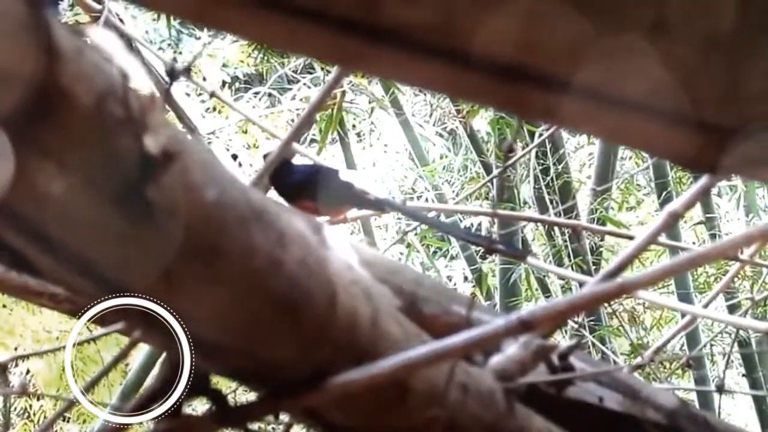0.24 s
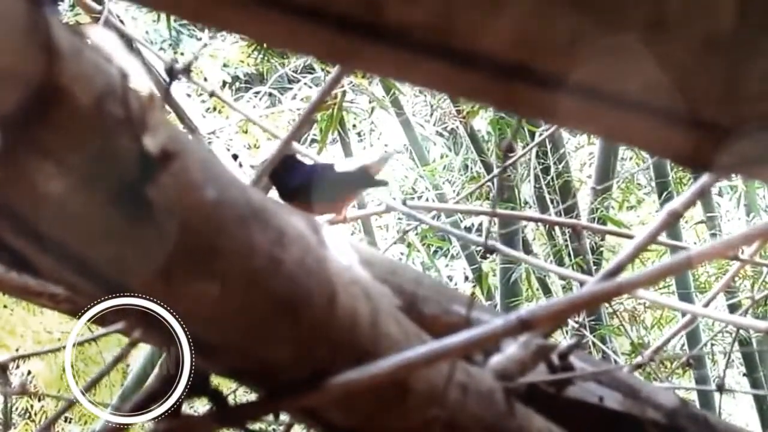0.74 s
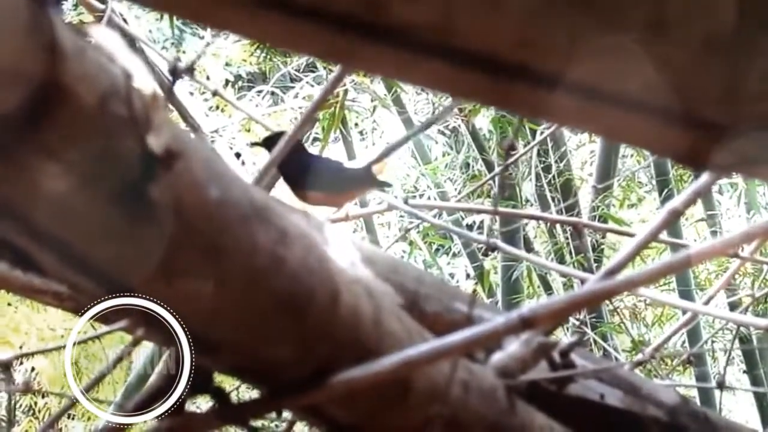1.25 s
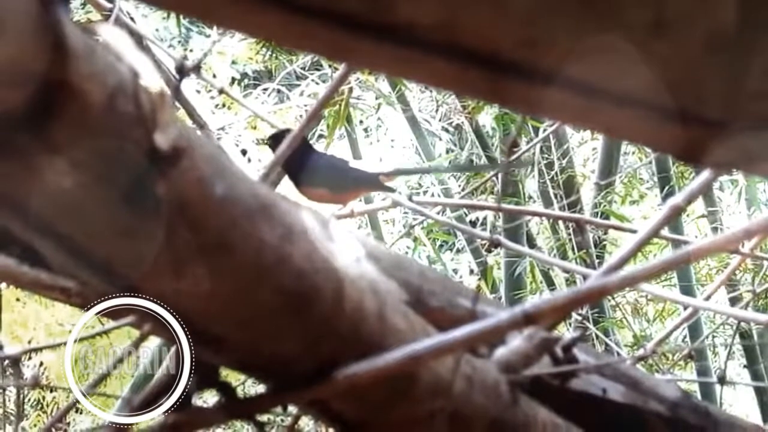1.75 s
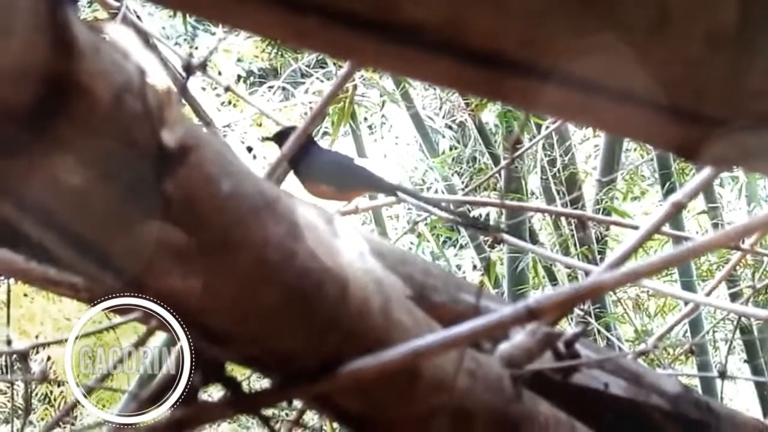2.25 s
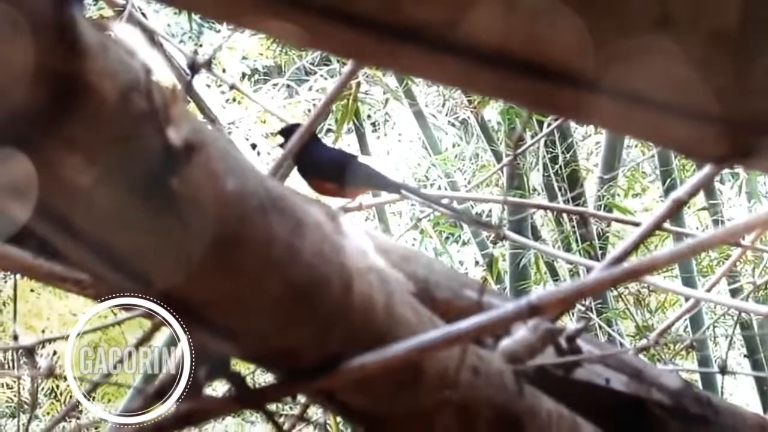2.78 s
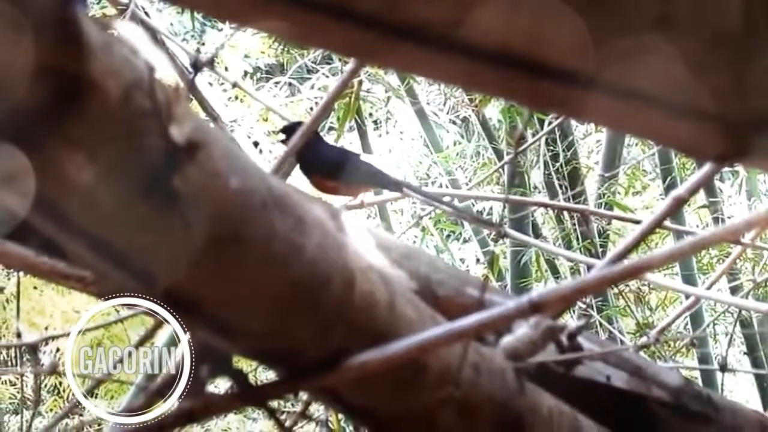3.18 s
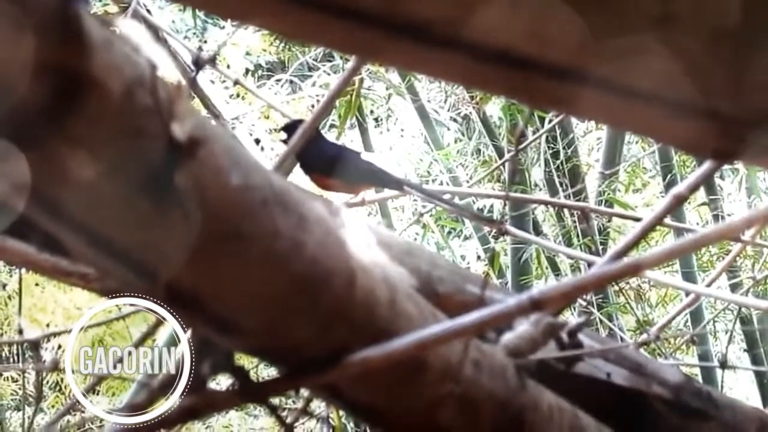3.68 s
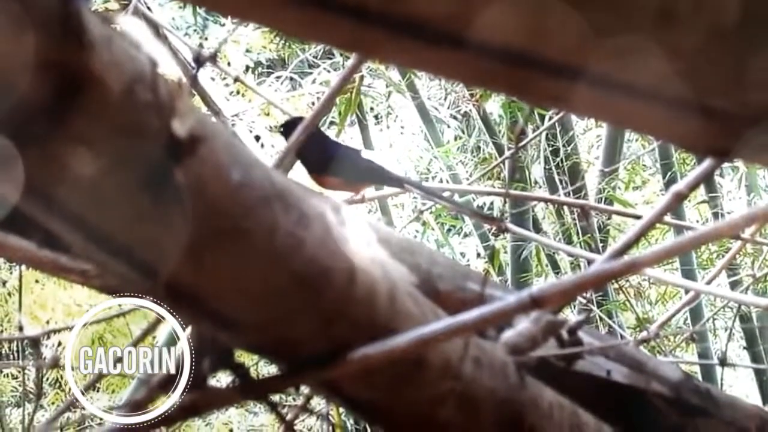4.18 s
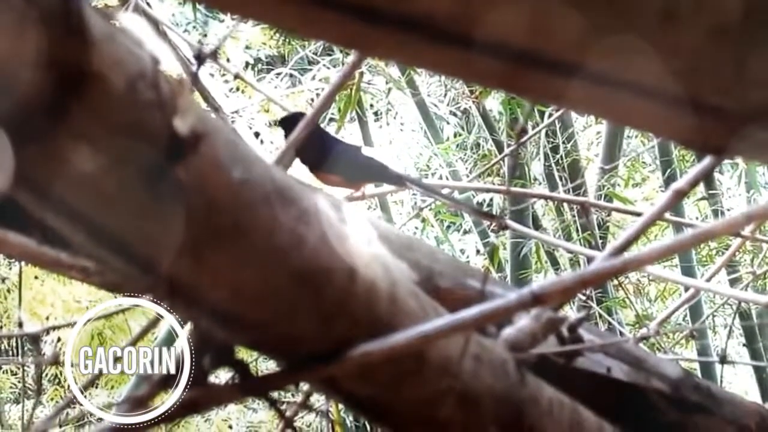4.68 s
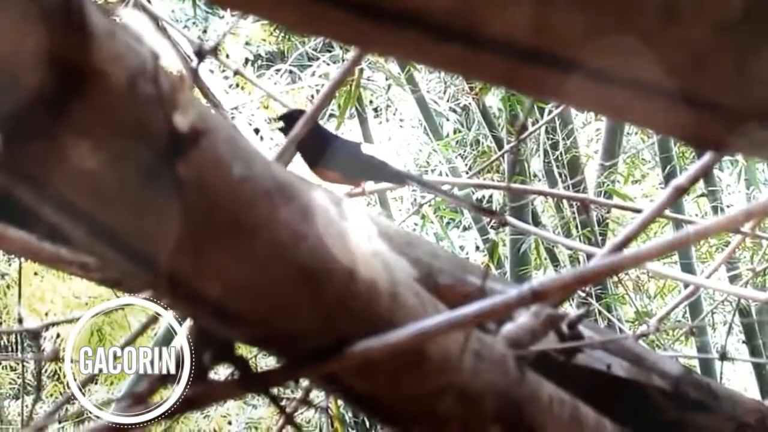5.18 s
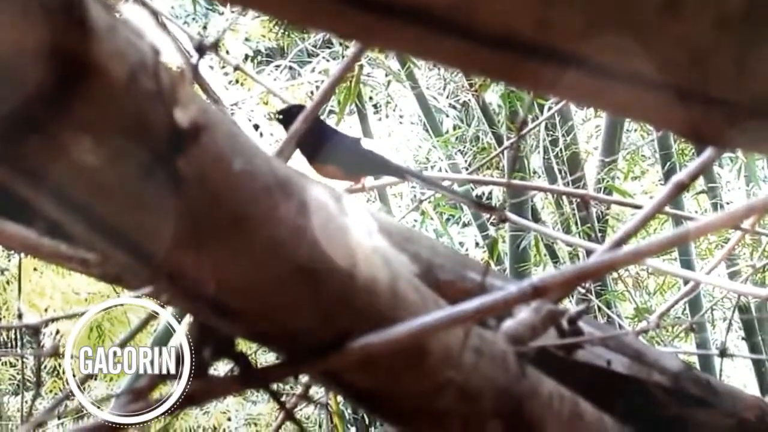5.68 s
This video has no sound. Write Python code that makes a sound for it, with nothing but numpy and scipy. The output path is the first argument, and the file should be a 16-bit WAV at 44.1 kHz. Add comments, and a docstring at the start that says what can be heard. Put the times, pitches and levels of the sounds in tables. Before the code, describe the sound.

A songbird close by sings quavering whistles, raspy calls with pips, falling slurs and a quick warble over a steady high hiss outdoors.

```python
"""Songbird beside a bamboo grove

A songbird sings close to the microphone, on a perch under a roof beam: three quavering whistles,
five rasp-and-pip calls, six falling slurs, a dry chuck and a quick warble with a yodel.
Its notes are modulated sines with overtones; rasps are a buzz through throat resonances, the chuck noise.
Beams, ground and stems return the song; the tail of an earlier whistle and thin far whistles ring there too.
Shaped noise makes the high hiss, low air and uneven middle wash, and feathers rustle as the tail flicks."""
import sys
import numpy as np
from scipy import signal
from scipy.fft import rfft, irfft, next_fast_len
from scipy.io import wavfile
from scipy.ndimage import uniform_filter1d, minimum_filter1d

SR = 44100
rng = np.random.default_rng(int(sys.argv[2]) if len(sys.argv) > 2 else 0)


def dump_mix(stems):
    """Bounce the given channels to the path in sys.argv[1] as a 16-bit WAV at rate SR."""
    frames = np.atleast_2d(stems).T  # one column per channel
    limited = np.clip(frames, -1, 1)  # hard clip at full scale
    pcm = np.round(limited * 32767).astype(np.int16)
    wavfile.write(sys.argv[1], SR, pcm)


N = 261513  # length in samples, about 5.93 s
TIME = np.arange(N) / SR


def amp(db):
    """Logarithmic level: decibels to an amplitude factor."""
    return 10 ** (np.asarray(db) / 20)


def unit(x):
    """Normalization: scales a signal to rms 1."""
    return x / np.sqrt(np.mean(x ** 2) + 1e-20)


def read(points, hz):
    """Spectral interpolation: straight lines on a log-frequency axis."""
    f, value = np.transpose(points)
    return np.interp(np.log(hz + 1), np.log(f + 1), value)


def follow(rows):
    """Linear interpolation: sample times of a curve table, then each column at those times."""
    s, *columns = np.transpose(rows)
    t = np.arange(s[0], s[-1], 1 / SR)
    return t, *(np.interp(t, s, column) for column in columns)


def add(mix, s, sound):
    """Superposition: mixes a sound in at time s."""
    part = mix[..., max(round(s * SR), 0):][..., :sound.shape[-1]]
    part += sound[..., :part.shape[-1]]


def wobble(size, hz):
    """Low-passed random fluctuation of rms 1, with a Gaussian roll-off at the given rate."""
    padded = size + 4096
    f = np.fft.rfftfreq(padded, 1 / SR)
    spectrum = rfft(rng.standard_normal(padded)) * np.exp(-(f / hz) ** 2)
    return unit(irfft(spectrum))[:size]


# likeness of the left and right noise: frequency_hz, correlation (share)
NOISE_LIKENESS = [(50, 0.7), (150, 0.61), (400, 0.55), (2000, 0.9), (4500, 0.7), (7000, 0.023),
                  (11000, 0.014)]


def noise(colour):
    """Interaural coherence: coloured stereo noise, almost unrelated left and right above 7 kHz."""
    hz = np.fft.rfftfreq(next_fast_len(N + 1, True), 1 / SR)
    a, b = rng.standard_normal((2, len(hz))) + 1j * rng.standard_normal((2, len(hz)))
    same = np.clip(read(NOISE_LIKENESS, hz), -1, 1)
    pair = np.array([a, same * a + np.sqrt(1 - same ** 2) * b])
    return unit(irfft(pair * amp(read(colour, hz)))[:, :N])


def song():
    """Point source: all notes from one perch, as the body of the voice and its beamed overtones."""
    voice = np.zeros((2, N))
    for notes in quavering_whistles(), slurs(), arched_notes(), [yodel()], warble_glides():
        for s, sound in notes:
            add(voice, s, sound)
    return voice[0] + rasp_and_pip_calls() + chuck(*CHUCK), voice[1]


# strength of the overtones from the third up: frequency_hz, level_db relative to the note's effort
OVERTONES = [(2000, -24), (2700, -23), (4000, -29), (6000, -41), (7400, -40.5), (8200, -20.5),
             (9000, -26.5), (9600, -21), (10200, -25.5), (11200, -28), (13000, -85)]


def syrinx(hz, main_db, octave_db, edge_db, jitter=0.0066, beamed=.0, growth=0.97, blur=0.28, octave_blur=0.5):
    """Directivity: a nearly pure tone spreads all round, and the bill beams its overtones away."""
    size = len(hz)
    phase = 2 * np.pi * np.cumsum(hz * (1 + jitter * wobble(size, 630))) / SR
    tone = amp(main_db) * np.sin(phase)
    tone += (1 - beamed) * amp(octave_db) * np.sin(2 * phase)
    upper = beamed * amp(octave_db) * np.sin(2 * phase + octave_blur * wobble(size, 760))
    # louder singing also drives the higher overtones
    effort_db = growth * np.maximum(main_db, octave_db) + edge_db
    for k in range(3, 8):
        level = amp(effort_db + read(OVERTONES, k * hz)) * (k * hz < SR / 3)
        upper += level * np.sin(k * phase + blur * wobble(size, 400))
    return np.array([tone, upper]) * signal.windows.tukey(size, min(0.0012 * SR / size, 1))


# each quaver is a rounded arch with a sharp trough; the quavering fades in
QUAVER_CUSP, QUAVER_RISE_S = 0.062, 0.0091


def quaver(age, rate, after, slowing=0):
    """Periodic modulation: a train of pitch arches that sets in some time into a note."""
    t = np.maximum(age - after, 0)
    turn = 2 * np.pi * (rate * t - slowing * t ** 2 / 2)
    fade_in = np.minimum(t / QUAVER_RISE_S, 1)
    return -fade_in * (np.cos(turn) + QUAVER_CUSP * np.cos(2 * turn))


def swell(u, crest, edge_db, shape):
    """Amplitude envelope: level in dB along a short note, up to its crest and down again."""
    return edge_db * np.interp(u, [0, np.clip(crest, .05, .95), 1], [1, 0, 1]) ** shape


# a whistle starts smooth, then quavers ever wider: delay (s) and first depth (Hz)
QUAVER_AFTER_S, QUAVER_HZ = 0.031, 55
SLOWING_PER_S2 = 27.4  # fall of the quaver rate, per second each second


def whistle(rows, rate, widen_hz_per_s, octave_db, octave_db_per_s, edge_db, jitter, pulse_db=0.5,
            uneven=0.15, octave_pulse_db=5):
    """Frequency and amplitude modulation: a held note quavers; its octave grows or fades steadily."""
    t, hz, db = follow(rows)
    age = t - t[0]
    arch = quaver(age, rate, QUAVER_AFTER_S, SLOWING_PER_S2)
    depth_hz = QUAVER_HZ + widen_hz_per_s * age
    hz = hz + depth_hz * arch * (1 + uneven * wobble(len(t), 41))
    octave = np.minimum(octave_db + octave_db_per_s * age, db) + octave_pulse_db * arch
    return t[0], syrinx(hz, db + pulse_db * arch, octave, edge_db, jitter, beamed=0.9, growth=0.7)


# contours of the three whistles, about which they quaver: start_s, pitch_hz, level_db
OPENING_WHISTLE = [(0.0, 2518, -9), (0.02, 2385, -17), (0.06, 2360, -21), (0.076, 2520, -41)]
FALLING_WHISTLE = [(1.548, 2426, -30), (1.563, 2615, -10.5), (1.6, 2722, 0.5), (1.635, 2680, -1),
                   (1.672, 2553, -5.5), (1.77, 2485, -9), (1.825, 2439, -12), (1.846, 2367, -41)]
RISING_WHISTLE = [(2.707, 2144, -33), (2.717, 2415, -12), (2.729, 2568, -1), (2.775, 2622, -3.5),
                  (2.845, 2596, -13.5), (3.0, 2792, -15), (3.11, 3028, -17), (3.282, 2870, -20.5),
                  (3.295, 2820, -40)]


def quavering_whistles():
    """Vibrato: three long notes; rate is in quavers per second as the quavering begins."""
    return [
        whistle(OPENING_WHISTLE, rate=37.0, widen_hz_per_s=100, octave_db=-48, octave_db_per_s=-100,
                edge_db=-18.0, jitter=0.0021),
        whistle(FALLING_WHISTLE, rate=47.3, widen_hz_per_s=230, octave_db=-33.5, octave_db_per_s=-52,
                edge_db=-4.0, jitter=0.0032, pulse_db=3.0),
        whistle(RISING_WHISTLE, rate=51.3, widen_hz_per_s=577, octave_db=-25.0, octave_db_per_s=8.5,
                edge_db=8.5, jitter=0.0049)]


# rasp-and-pip calls: start_s, rasp_length_s, buzz_start_hz, buzz_held_hz, buzz_end_hz, rasp_db,
# pip_delay_s, pip_length_s, pip_start_hz, pip_end_hz, pip_db, pip_crest (share of length)
RASP_PIPS = [(3.353, 0.02, 2050, 1959, 1250, -0.5, 0.021, 0.023, 4004, 3010, -6, 0.48),
             (3.46, 0.016, 1490, 1427, 1372, 1.5, .028, 0.016, 5240, 4070, 0.5, 0.45),
             (3.565, 0.017, 927, 1457, 1423, -9, 0.025, 0.027, 4770, 5160, -4.5, .2),
             (3.67, 0.021, 800, 1453, 1435, -7.5, 0.032, 0.0141, 4654, 4430, -1.5, 0.68),
             (3.782, 0.029, 780, 1404, 1360, -9, 0.034, 0.019, 4485, 4105, -3, 0.59)]
# the fizz that comes with roughness: frequency_hz, level_db
FIZZ_COLOUR = [(700, -24), (1300, -42), (1650, 1.5), (2200, -19), (3000, -1), (4500, -12), (5300, -25.5),
               (6100, -1), (7000, -15), (7900, -2), (9200, -4), (10500, 13), (11500, -21), (13000, -33)]


def rasp_and_pip_calls():
    """Spectral contrast: each call is a harsh rasp and, a moment later, a clear pip."""
    out, fizz = np.zeros(N), noise(FIZZ_COLOUR)[0]
    for s, length, start_hz, held_hz, end_hz, db, delay, *pip in RASP_PIPS:
        add(out, *rasp(s, length, start_hz, held_hz, end_hz, db))
        add(out, *chip(fizz, s + delay, *pip))
    return out


# resonances of the throat during a rasp: frequency_hz, level_db
RASP_COLOUR = [(900, -38), (1400, -41), (1650, -21), (2150, -28.5), (2700, -20.5), (3250, -3.5),
               (3600, -17.5), (3900, -4.5), (4300, -2), (4900, -18), (5400, -24.5), (5950, -10.5),
               (6800, -29), (7700, -15.5), (9000, -28), (10500, -15), (12000, -29.5)]
RASP_SETTLE_S = 0.0062  # time a rasp takes to reach its pitch, and to leave it
# roughness: shake of pitch (share), shake of each partial (share), noise among the partials (dB)
RASP_JITTER, RASP_FLUTTER, RASP_GRIT_DB = .018, .33, -8


def rasp(s, length, start_hz, held_hz, end_hz, db, chaos_hz=450):
    """Source and filter: an unsteady, gliding buzz rings the fixed resonances of the throat."""
    size = int(length * SR)
    age = np.arange(size) / SR
    slide_on = (start_hz - held_hz) * np.exp(-(age / RASP_SETTLE_S) ** 2)
    slide_off = (end_hz - held_hz) * np.exp(-(age[::-1] / RASP_SETTLE_S) ** 2)
    hz = held_hz + slide_on + slide_off
    phase = 2 * np.pi * np.cumsum(hz * (1 + RASP_JITTER * wobble(size, chaos_hz))) / SR
    buzz = sum((1 + RASP_FLUTTER * wobble(size, chaos_hz)) * np.sin(k * phase) for k in range(1, 8))
    grit = amp(RASP_GRIT_DB) * rng.standard_normal(size)
    drive = np.zeros(N)
    add(drive, s, amp(db) * signal.windows.tukey(size, .6) * (buzz + grit))
    padded = next_fast_len(N, True)
    throat = amp(read(RASP_COLOUR, np.fft.rfftfreq(padded, 1 / SR)))
    return 0, irfft(rfft(drive, padded) * throat, padded)[:N]


def chip(fizz, s, length, start_hz, end_hz, db, crest, rough=.11, chaos_hz=1300, swing=0.21,
         octave_db=-1, fizz_db=-1, edge_db=-11):
    """Irregular vibration: flapping of the membranes roughens a very short note."""
    size = int(length * SR)
    hz = np.linspace(start_hz, end_hz, size) * (1 + swing * rough * wobble(size, chaos_hz))
    phase = 2 * np.pi * np.cumsum(hz) / SR
    octave = amp(octave_db + read(RASP_COLOUR, 2 * hz)) * np.sin(2 * phase)
    tone = unit(1 + rough * wobble(size, chaos_hz)) * (np.sin(phase) + octave)
    grit = amp(fizz_db) * rough * fizz[int(s * SR):][:size]
    level_db = db + swell(np.linspace(0, 1, size), crest, edge_db, ARCH_SHAPE)
    return s, amp(level_db) * signal.windows.tukey(size, .25) * (tone + grit)


def slur(s, length, start_hz, end_hz, db, octave_db=-39):
    """Glissando: a note holds its pitch and swells, then drops ever faster."""
    u = np.linspace(0, 1, int(length * SR))
    level_db = db + swell(u, SLUR_CREST, SLUR_EDGE_DB, SLUR_SHAPE)
    hz = start_hz + (end_hz - start_hz) * np.interp(u, [SLUR_HOLD, 1], [0, 1]) ** SLUR_BEND
    tone = syrinx(hz, level_db, level_db + octave_db, edge_db=-2.0, blur=0.18)
    return s, tone * signal.windows.tukey(len(u), .2)


# falling slurs: start_s, length_s, start_pitch_hz, end_pitch_hz, level_db
SLURS = [(4.101, 0.094, 2250, 1655, -17), (4.242, 0.074, 2063, 1680, -10.5),
         (4.359, 0.067, 2036, 1703, -5.5), (4.467, 0.065, 2026, 1683, -2), (4.573, 0.0626, 1975, 1764, -2),
         (4.685, 0.054, 1992, 1694, -1.5)]
SLUR_HOLD, SLUR_CREST = .39, 0.82  # end of the held pitch and loudest point, as shares of the length
SLUR_BEND, SLUR_EDGE_DB, SLUR_SHAPE = 1.224, -14.5, 1.6  # curve of the drop; level at both ends; bluntness


def slurs():
    """Repetition: six falling notes in a row."""
    return [slur(*row) for row in SLURS]


# the slightly grainy quick notes: shake of pitch (share) and of level (dB)
WARBLE_JITTER, WARBLE_FLUTTER_DB = .013, 1.8


def warble(hz, db, octave_db):
    """Random modulation: the slightly grainy voice of the quick notes."""
    grain_db = WARBLE_FLUTTER_DB * wobble(len(hz), 183)
    return syrinx(hz, db + grain_db, octave_db + grain_db, edge_db=4.5, jitter=WARBLE_JITTER, blur=1.0)


# short arched notes: start_s, length_s, start_pitch_hz, middle_pitch_hz, end_pitch_hz, level_db,
# crest (share of length)
ARCHES = [(4.787, 0.071, 887, 1189, 936, -18, 0.48), (4.9, 0.02, 1780, 2160, 2020, -2.5, 0.48),
          (5.022, 0.052, 1065, 1020, 930, -25.5, 0.59), (5.199, 0.023, 1350, 1566, 1280, -8, 0.4),
          (5.2188, 0.014, 1440, 2115, 1900, -2.5, 0.48), (5.2387, 0.0125, 2490, 3117, 2080, 0.5, 0.75),
          (5.2565, 0.013, 3165, 3437, 2850, -4.5, 0.72), (5.275, 0.0092, 3260, 3860, 3200, -10.5, 0.85),
          (5.282, 0.03, 3880, 4000, 3630, -5, 0.61), (5.315, .014, 3660, 3530, 3280, -18, 0.36),
          (5.569, 0.056, 647, 1333, 718, -18.5, 0.55)]
ARCH_EDGE_DB, ARCH_SHAPE = -10.5, 1.23  # level at both ends of an arch; bluntness of its crest
# low notes leak more of their octave: pitch_hz, octave_db relative to the fundamental
OCTAVE_LEAK = [(750, 4), (1000, -12), (1300, -14), (1700, -29), (2200, -41), (4000, -20)]


def arched_notes():
    """Parabolic glide: short clear notes whose pitch bends through three points."""
    notes = []
    for s, length, start_hz, middle_hz, end_hz, db, crest in ARCHES:
        u = np.linspace(0, 1, int(length * SR))
        hz = np.polyval(np.polyfit([0, .5, 1], [start_hz, middle_hz, end_hz], 2), u)
        level_db = db + swell(u, crest, ARCH_EDGE_DB, ARCH_SHAPE)
        tone = warble(hz, level_db, level_db + read(OCTAVE_LEAK, hz))
        notes.append((s, tone * signal.windows.tukey(len(u), .2)))
    return notes


# contour of the yodel: start_s, pitch_hz, octave_db, fundamental_db
YODEL = [(4.922, 1710, -20, -24), (4.927, 1530, -11, -26), (4.934, 1610, -15, -26), (4.942, 1860, -24, -22),
         (4.953, 1915, -18, -18), (4.957, 1744, -18, -20), (4.962, 1460, -1, -29), (4.969, 1411, -5.5, -31),
         (4.979, 1487, -8, -23), (4.985, 1625, -18, -33), (4.993, 1412, -12, -31), (5.0, 1203, -6.5, -42),
         (5.012, 1028, -17.5, -39)]


def yodel():
    """Resonance tuning: the throat favours the octave, so the voice flips above a weaker fundamental."""
    t, hz, octave_db, fundamental_db = follow(YODEL)
    return t[0], warble(hz, fundamental_db, octave_db)


def glide(rows, rate=0, depth=0, pulse_db=0, after=0, octave_db=0):
    """Frequency glide: it may quaver by a share of its pitch, and its level moves with the quaver."""
    t, hz, db = follow(rows)
    arch = quaver(t - t[0], rate, after)
    hz, db = hz * (1 + depth * arch), db + pulse_db * arch
    return t[0], warble(hz, db, db + octave_db + read(OCTAVE_LEAK, hz))


# contours of the gliding notes of the warble: start_s, pitch_hz, level_db
CLIMB = [(5.157, 1467, -31), (5.165, 1303, -24), (5.173, 1226, -27), (5.184, 1353, -19), (5.194, 1244, -18),
         (5.203, 1400, -22)]
WHIP = [(5.69, 1720, -25), (5.698, 3270, -22), (5.703, 2940, -13), (5.708, 3390, -13), (5.711, 2555, -12.5),
        (5.718, 3350, -18), (5.727, 3393, -7.5), (5.736, 2656, -0.5), (5.742, 2275, -24),
        (5.749, 1440, -32)]
SAG = [(5.378, 1797, -34), (5.392, 1990, -16.5), (5.407, 1873, -7), (5.42, 1733, -10), (5.47, 1697, -9),
       (5.496, 1252, -23)]
TRILL = [(5.793, 1812, -45), (5.806, 1662, -17), (5.85, 1575, -14.5), (5.89, 1655, -11), (5.93, 1726, -12)]


def warble_glides():
    """Pitch contour: four gliding notes, two of them quavering; the trill's crests are louder."""
    return [
        glide(CLIMB, octave_db=6.0),
        glide(WHIP),
        glide(SAG, rate=34.7, depth=0.018, pulse_db=-0.5, after=0.0464),
        glide(TRILL, rate=26.3, depth=0.139, pulse_db=6.5, after=0)]


# the dry chuck just before the yodel: start_s, level_db, decay_s
CHUCK = (4.885, -12.5, 0.016)
# its colour: frequency_hz, level_db
CHUCK_COLOUR = [(70, -57.5), (150, -45), (240, -18), (330, -6), (450, -4.5), (720, -6), (1200, -14),
                (1800, -7), (2500, -9), (5000, -21), (6300, -16.5), (8400, -19.5), (11000, -42)]
# its hollow ring: frequency_hz, level_db, t60_s
CHUCK_RING = [(399.5, -12.5, 0.069), (518, -15.5, 0.055), (647, -16, 0.066), (760, -19, 0.049)]
CHUCK_FLOOR_HZ = 282  # the chuck has little body below this


def chuck(s, db, decay):
    """Damped modes: a dry noise burst with a sudden start and a short hollow ring."""
    age = np.maximum(TIME - s, 0)
    burst = amp(db) * noise(CHUCK_COLOUR)[0] * np.exp(-(age / decay) ** 2)
    ring = sum(amp(level - 60 * age / t60) * np.sin(2 * np.pi * hz * age) for hz, level, t60 in CHUCK_RING)
    sound = (burst + ring) * (1 - np.exp(-age / 0.001))
    return signal.sosfilt(signal.butter(4, CHUCK_FLOOR_HZ, "highpass", fs=SR, output="sos"), sound)


# first reflections, off the near beams and the ground: left_delay_s, right_delay_s, level_db
ECHOES = [(.00122, .00122, -19.5), (.00179, .00179, -28.5), (.00238, 0.0021, -23.5),
          (.00372, 0.0035, -15.5), (.00469, 0.0055, -15.5), (.00646, 0.0056, -13.5), (0.0164, .0157, -22)]


def echoes(x):
    """Specular reflection: single hard echoes, most of them a little different left and right."""
    out = np.zeros((2, N))
    for *delays, db in ECHOES:
        for channel, delay in zip(out, delays):
            add(channel, delay, amp(db) * x)
    return out


def scatter(x, t60s, delay, likeness):
    """Multiple scattering: sparse reflections of random sign, each band dying at its own speed."""
    taps = rng.choice([-1., 1.], (3, SR)) * (rng.random((3, SR)) < 3000 / SR)  # about 3000 per second
    hz, t, z = signal.stft(taps, SR, nperseg=256)
    decay = amp(-60 * t / read(t60s, hz)[:, None])
    tails = signal.istft(z * decay, SR, nperseg=256)[1]
    tails = np.pad(tails, ((0, 0), (int(delay * SR), 0)))
    share = np.clip(likeness, 0, 1)
    pair = np.sqrt(share) * tails[0] + np.sqrt(1 - share) * tails[1:]  # one shared tail, two of their own
    return signal.fftconvolve(x[None], pair / np.linalg.norm(pair[0]), axes=1)[:, :N]


def shimmer(x, radians, rate_hz):
    """Phase modulation: the phase of a tail wanders, so that it is diffuse and holds no steady tone."""
    analytic = signal.hilbert(x, next_fast_len(N))[:, :N]
    return (analytic * np.exp(1j * radians * wobble(N, rate_hz))).real


# reverberation of the grove: frequency_hz, t60_s
GROVE = [(300, 0.16), (1500, 0.74), (2600, 0.62), (4000, 0.94), (10000, 0.84)]


def reflected_song(voice, overtones):
    """Reverberation: beams and grove return the voice, and the beamed overtones come with a haze."""
    beams = amp(-7.0) * scatter(voice, [(300, 0.11), (10000, 0.14)], delay=0.004, likeness=0.88)
    stems = scatter(voice, GROVE, delay=0.013, likeness=0.32)
    grove = amp(-14.5) * shimmer(stems, radians=1.3, rate_hz=60)
    # the bill points away, so about half of the overtones arrive as reflections
    thrown = scatter(overtones, [(3000, 0.079), (10000, 0.055)], delay=0.0027, likeness=0.45)
    sheen = amp(-7.5) * (overtones + thrown)
    late = scatter(overtones, [(3000, 0.3), (10000, 0.22)], delay=0.0072, likeness=0.4)
    haze = amp(-11) * shimmer(late, radians=0.97, rate_hz=270)
    return echoes(voice) + beams + grove + sheen + haze


# feather rustles: peak_s, width_s, level_db
RUSTLES = [(.72, 0.065, -30.5), (1.03, 0.067, -28), (1.42, 0.1, -29), (1.82, 0.086, -32)]
# their colour: frequency_hz, level_db
RUSTLE_COLOUR = [(3000, -60), (4400, -33), (5000, -1), (5600, -9), (6300, 6), (7200, -4), (9000, -4),
                 (11000, -31)]


def feathers():
    """Friction noise: soft Gaussian swishes as the tail flicks."""
    swish = sum(amp(db) * np.exp(-.5 * ((TIME - s) / width) ** 2) for s, width, db in RUSTLES)
    return swish * noise(RUSTLE_COLOUR)


# first row, the dying tail of an earlier near whistle; then thin far whistles:
# start_s, length_s, start_pitch_hz, end_pitch_hz, level_db
DIFFUSE_WHISTLES = [(0, 0.12, 2545, 2490, -36), (0.48, 0.29, 3670, 3890, -40),
                    (0.654, 0.31, 3206, 3170, -43), (0.698, 0.65, 3517, 3492, -43.5),
                    (1.216, 0.36, 3560, 3483, -40)]


def diffuse_whistles(waver=0.011):
    """Diffuse propagation: an earlier whistle's tail and far whistles, smeared by the many stems."""
    out = np.zeros(N)
    for s, length, start_hz, end_hz, db in DIFFUSE_WHISTLES:
        size = int(length * SR)
        hz = np.linspace(start_hz, end_hz, size) * (1 + waver * wobble(size, 122))
        phase = 2 * np.pi * np.cumsum(hz) / SR
        add(out, s, amp(db) * np.sin(phase) * signal.windows.tukey(size, .5))
    return shimmer(scatter(out, GROVE, delay=.005, likeness=0.5), radians=.8, rate_hz=50)


def bed(colour, level, flicker_db):
    """Broadband noise: a noise bed whose level follows a given curve and flickers a little."""
    curve_db = np.interp(TIME, *np.transpose(level))
    return noise(colour) * amp(curve_db + flicker_db * wobble(N, 31.4))


# levels of the high hiss, the low air and an uneven wash of middle noise: start_s, level_db
HISS_LEVEL = [(0, -34), (1.5, -29.5), (1.62, -39), (2, -31), (3.45, -32.5), (3.9, -40), (4.3, -36.5),
              (4.8, -36), (5.05, -39), (5.93, -40)]
AIR_LEVEL = [(0, -47), (.7, -45), (1.948, -48.5), (2.6, -46), (3.3, -48), (3.499, -65.5), (3.9, -51.5),
             (4.75, -48), (5.1, -56), (5.93, -51.5)]
MID_NOISE_LEVEL = [(0, -91), (1.9, -42), (2.68, -43.5), (2.8, -33), (3, -40), (4.201, -76), (4.7, -35.5),
                   (5.1, -53), (5.93, -49)]
# their colours; the wash is strongest from 2 to 4.4 kHz: frequency_hz, relative density (dB per Hz)
HISS_COLOUR = [(2500, -37), (4100, -14), (4700, 8), (5200, 7), (5700, 6), (6600, 12.5), (7200, 12),
               (7800, 8), (8500, 14.5), (9200, 9), (9900, 13), (10600, 3), (11000, -17.5), (12000, -63)]
AIR_COLOUR = [(20, -26), (60, -3), (150, 2), (330, 3.5), (800, 1.5), (1300, -3.5), (2000, -9),
              (3000, -12.5), (4000, -22.5), (5000, -1.5), (12000, -47)]
MID_NOISE_COLOUR = [(1200, -25.5), (2000, -10.5), (2600, -3), (3500, -7.5), (4400, -8.5), (6000, -23)]


def background():
    """Incoherent addition: hiss, air and middle noise are independent of one another."""
    hiss = bed(HISS_COLOUR, HISS_LEVEL, flicker_db=1.63)
    air = bed(AIR_COLOUR, AIR_LEVEL, flicker_db=2.5)
    mid_noise = bed(MID_NOISE_COLOUR, MID_NOISE_LEVEL, flicker_db=4.5)
    return hiss + air + mid_noise


def scene():
    """Superposition: direct song, its reflections, feathers, diffuse whistles and background."""
    voice, overtones = song()
    return voice + reflected_song(voice, overtones) + feathers() + diffuse_whistles() + background()


def low_pass(x, hz):
    """Linear-phase filtering: a steep band limit without delay."""
    return signal.oaconvolve(x, signal.firwin(255, hz, window=("kaiser", 8), fs=SR)[None], "same")


MIC_HZ, EDGE_HZ = 11600, 16000  # band limits of the microphone and of the output
CEILING = 1.08  # limiter ceiling, above full scale


def record(dry):
    """Band limiting and peak limiting: a narrow microphone, a fast limiter, and clipping of the crests."""
    x = low_pass(dry, MIC_HZ)
    gain = np.minimum(CEILING / (abs(x).max(0) + 1e-9), 1)
    gain = uniform_filter1d(minimum_filter1d(gain, size=90), size=90)
    return low_pass(np.clip(x * gain, -1, 1), EDGE_HZ)


dry = scene()
out = record(dry)
dump_mix(out)
```